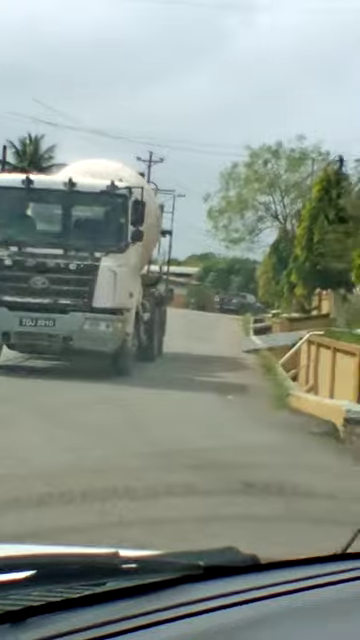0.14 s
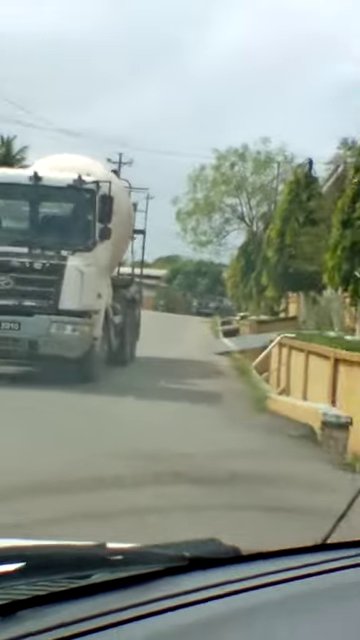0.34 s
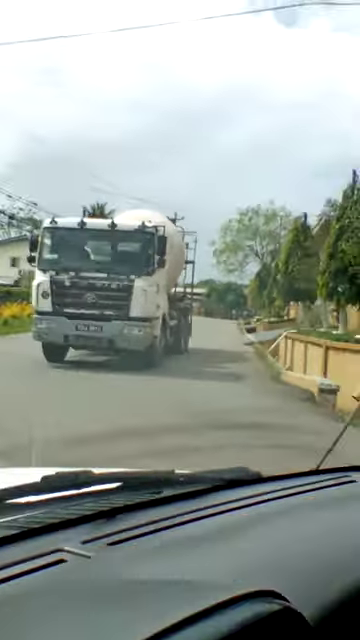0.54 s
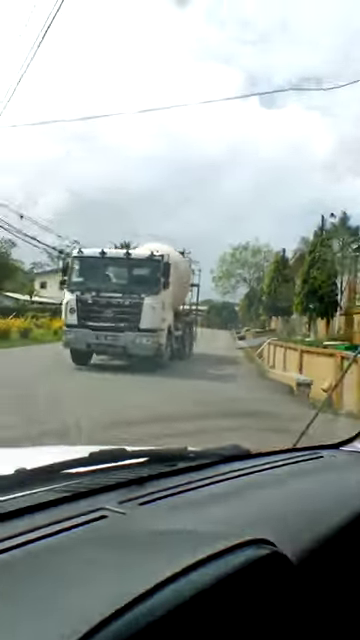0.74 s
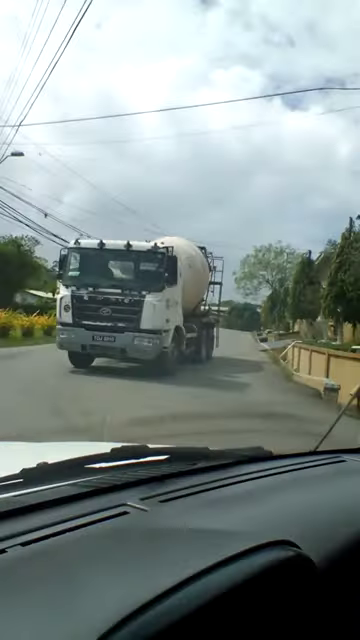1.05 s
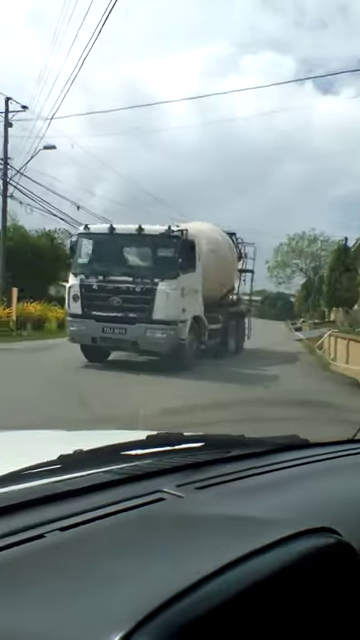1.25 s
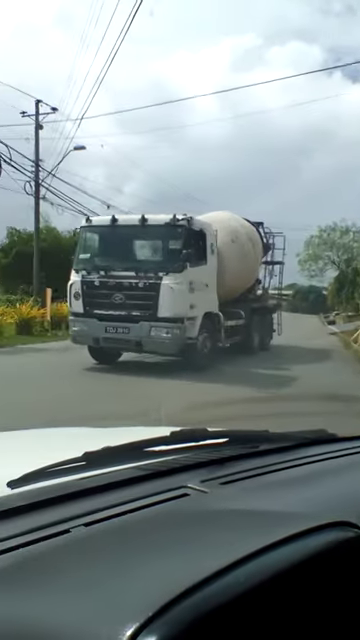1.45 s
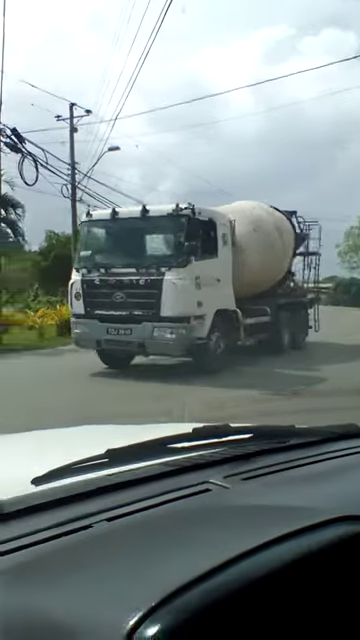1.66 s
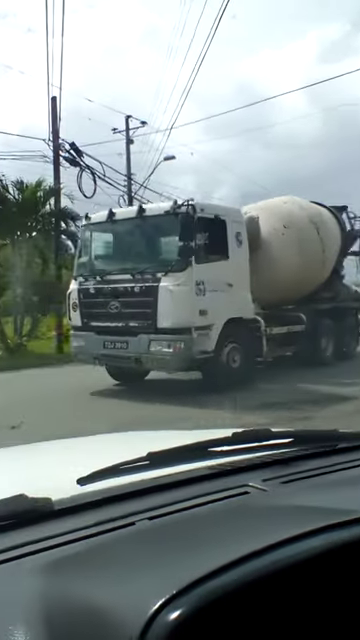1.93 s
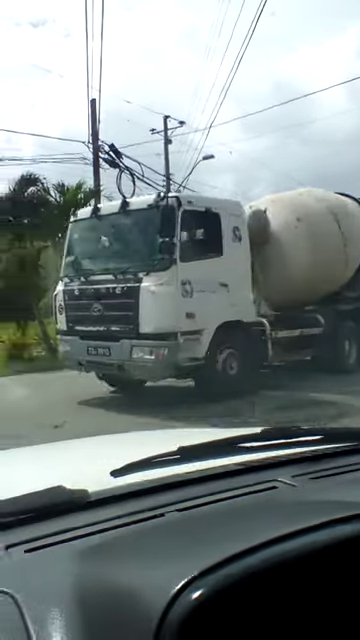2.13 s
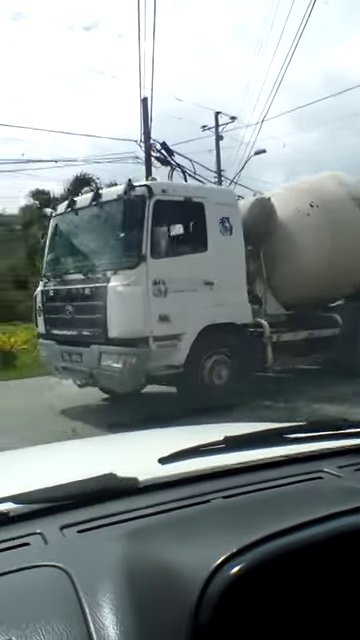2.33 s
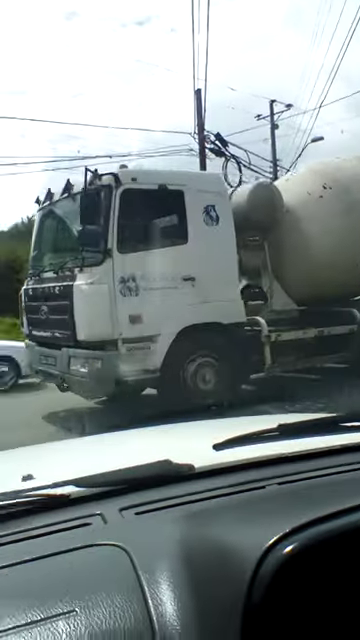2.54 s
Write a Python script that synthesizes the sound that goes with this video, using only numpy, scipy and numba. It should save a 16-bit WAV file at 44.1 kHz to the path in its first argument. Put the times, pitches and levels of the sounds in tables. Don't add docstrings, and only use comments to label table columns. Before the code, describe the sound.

A heavy diesel truck rumbles evenly with a dull metallic clatter, revs briefly early on, then rolls up close. Heard by a phone inside a car, where the indicator ticks and tocks crisply at arm's length.

```python
import sys
import numpy as np
from scipy import signal
from scipy.fft import rfft, irfft, next_fast_len
from scipy.io import wavfile
from scipy.ndimage import uniform_filter1d
from numba import njit

SR = 44100
rng = np.random.default_rng(int(sys.argv[2]) if len(sys.argv) > 2 else 0)


def volts_from_decibels(level):
    exponent = np.asarray(level, float) / 20
    return 10 ** exponent


def persist_wave(psi):
    counts = np.round(np.clip(psi, -1, 1) * 32767).astype(np.int16)
    wavfile.write(sys.argv[1], SR, np.atleast_2d(counts).T)


N = 118629

# (frequency [Hz], level [dB])
HISS_SPECTRUM = [(6000, -6), (8500, -8), (10800, -8.5), (11600, -10.5), (14000, -10.5), (14900, -.5),
                 (15750, 1)]
# (time [s], level [dB])
OVERALL_LEVEL = [
    (.07, -97),
    (.084, -34),
    (.1, -14),
    (.13, -11.5),
    (.2, -5.5),
    (.3, -1.5),
    (.4, .5),
    (2.685, .5),
    (2.69, -4),
]
# (time [s], level [dB])
DASH_CREAKS = [(1.272, -82), (1.353, -83), (1.5217, -81), (1.577, -81), (2.33, -81), (2.4242, -76)]
# (time [s], peak [dB], pitch [Hz], length [s])
LOOSE_RATTLES = [(0.215, -49.5, 2520, 0.013), (0.215, -58, 4550, 0.016), (0.583, -58, 3480, 0.018),
                 (0.584, -61, 5100, 0.021), (0.494, -65, 4840, .015), (0.926, -63, 5000, .01),
                 (0.983, -61.5, 4500, .04), (1.019, -60, 5000, .012), (1.262, -64, 4750, .015),
                 (1.271, -55, 5500, .02), (1.277, -64, 3960, 0.018), (1.291, -56, 5600, 0.012),
                 (1.292, -57.5, 3760, .014), (1.35, -59.5, 5200, 0.018), (1.512, -64.5, 4900, 0.033),
                 (1.581, -63, 6800, 0.0055), (1.722, -67, 5200, 0.038), (1.963, -59, 4600, 0.036),
                 (2.1, -61, 4700, 0.056), (2.22, -57.5, 4360, 0.028), (2.421, -63, 6500, 0.0098)]
# (time [s], peak [dB])
TOCK_TIMES = [(0.411, -41), (1.1205, -43), (1.8267, -39.5), (2.5339, -40.5)]
TICK_TIMES = [(.752, -40), (1.462, -40), (2.168, -39.5)]
# (centre [Hz], width [Hz], level [dB])
TOCK_MODES = [(1390, 390, -5.5), (2950, 220, -6.5), (3370, 120, 1), (3820, 76, -4.5), (4500, 180, -6.5),
              (5170, 250, -14), (5660, 230, -17), (7600, 350, -20.5), (10400, 300, -30),
              (11200, 300, -28.5), (4250, 1800, -5.5), (10000, 2500, -26), (15240, 900, -35)]
TICK_MODES = [(1520, 220, 1.5), (2060, 750, -8), (2630, 170, -2), (3020, 250, 0.5), (3600, 220, -8),
              (4500, 230, -5.5), (5300, 260, -15.5), (6300, 1100, -7.5), (7070, 280, -9.5),
              (10400, 300, -24.5), (4130, 2800, -4.5), (10000, 2500, -28), (15200, 900, -28.5)]
# (centre [Hz], width [Hz], level after the turn [dB], level before it [dB])
PANEL_MODES = [(616, 50, -61, -61.5), (962, 77, -60, -71), (1545, 47, -70, -74), (1363, 54, -78.5, -62.5),
               (2460, 70, -78.5, -74)]
CYLINDER_LEVELS = [0, -4.5, -2, -0.5, -3.5, -2.5]
# (centre [Hz], width [Hz], level [dB])
CABIN_MODES = [(71, 17, -10), (106.2, 23, 1), (142.1, 30, -3.5), (210.8, 33, -7.5), (248.3, 15, -7.5),
               (282.5, 31, -9.5), (319.3, 38, -5.5), (353.2, 29, -10.5), (382.5, 26, -11),
               (469.4, 67, -19.5), (634, 33, -26), (953, 89, -26), (1360, 110, -49)]
# (frequency [Hz], density [dB per Hz])
RUMBLE_SPECTRUM = [(18, -17.5), (30, -23), (100, 1), (167, -12.5), (242, -4), (381, -13), (408, -16.5),
                   (481, -19), (800, -45), (1040, -36.5), (1760, -120)]
CLATTER_SPECTRUM = [(500, 2), (980, -6), (1250, -8), (2600, -15.5), (3200, -23), (4800, -24.5), (6700, -35),
                    (7900, -54)]
# (time [s], rumble [dB], idle boom [dB], clatter [dB])
NEARNESS = [(.1, 3, 1.5, 0), (.2, 2, 0.5, -1.5), (.3, 4, -1.5, 0.5), (.45, 3.3, -1.5, 0),
            (.65, 1.3, -1.5, -1), (.82, 1.5, 1, -0.5), (1., 2.5, 1, 1), (1.2, -1, 1, 0),
            (1.4, 2.5, 2.5, 1.5), (1.6, 2, 1.5, -2), (1.75, 3, -3.5, 2), (1.96, 0, -1, 1.5),
            (2.1, 0.5, 0.8, 1.5), (2.3, 2, -1.5, 1), (2.45, 1.5, -2, 1.6), (2.69, -0.5, -4.5, 1.5)]
# (time [s], firing rate [Hz], level [dB])
TRUCK_REVS = [(.15, 41, -55), (.28, 43, -52), (.36, 44.8, -43), (.44, 45.6, -42), (.52, 46, -39.5),
              (.62, 46.2, -37.5), (.7, 45.5, -42), (.8, 42, -42), (.9, 38.5, -53), (1.1, 35.5, -51),
              (1.3, 33.2, -53), (1.9, 33.8, -55), (2.26, 34, -50), (2.69, 35.4, -46)]
# (multiple of the firing rate [-], level [dB])
EXHAUST_ORDERS = [(1, -2.5), (2, 8.3), (3, -1), (4, -9), (5, -6)]

IDLE_HZ = 35.3
TIME = np.arange(N) / SR


def level(x, db):
    return x * volts_from_decibels(db) / np.sqrt(np.mean(x ** 2))


def curve(table, axis):
    rows = np.array(table)
    return np.interp(TIME, rows[:, 0], rows[:, axis])


def lowpass(x, order, hz):
    return signal.sosfilt(signal.butter(order, hz, fs=SR, output="sos"), x)


@njit
def svf(x, hz, width):
    y, b, l = np.empty(len(x)), 0., 0.
    g, k = np.tan(np.pi * hz / SR), width / hz
    for i in range(len(x)):
        v = (b + g * (x[i] - l)) / (1 + g * (g + k))
        b, l, y[i] = 2 * v - b, l + 2 * g * v, k * v
    return y


def resonance(x, hz, width):
    once = svf(x, float(hz), float(width))
    return svf(once, float(hz), float(width))


def peak(x, hz, width):
    f = np.fft.rfftfreq(len(x), 1 / SR)
    return irfft(rfft(x) * np.exp(-((f - hz) / width) ** 2), len(x))


def walk(rate):
    hold = int(SR / rate)
    steps = np.repeat(rng.standard_normal(N // hold + 1), hold)
    return 1.36 * uniform_filter1d(uniform_filter1d(steps, hold), hold)[:N]


def bands(spectrum, count, patchy_db, rate, shared_db, narrow):
    hz, db = np.array(spectrum).T
    out, size = 0, next_fast_len(N)
    f = np.fft.rfftfreq(size, 1 / SR)
    centres = hz[0] * 2 ** np.arange(0, np.log2(hz[-1] / hz[0]), 1 / count)
    for k, centre in enumerate(centres):
        if k % 5 == 0:
            shared = walk(rate / 2)
            white = rfft(rng.standard_normal(size))
        band = irfft(white * np.exp(-((f - centre) * count / (narrow * centre)) ** 2), size)[:N]
        alone = patchy_db * 1.54 * np.tanh(walk(rate))
        flicker = min(centre / 3200, 1) * (alone + shared_db * shared)
        out = out + band * volts_from_decibels(np.interp(np.log(centre), np.log(hz), db) + flicker)
    return out


def microphone_hiss():
    return level(bands(HISS_SPECTRUM, count=14, patchy_db=.6, rate=30, shared_db=.5, narrow=.65), -81)


def creaks():
    tail_s = .006
    envelope = np.zeros(N)
    for s, db in DASH_CREAKS:
        envelope += volts_from_decibels(db) * (TIME > s) * np.exp(-np.clip(TIME - s, 0, None) / tail_s)
    return envelope * level(peak(rng.standard_normal(N), hz=9500, width=2500), 0)


def rattles():
    out = 0
    for s, db, hz, length in LOOSE_RATTLES:
        age = np.clip((TIME - s) / length, 0, None)
        clicks = rng.standard_normal(N) * volts_from_decibels(1.8 * rng.exponential(size=N))
        ring = level(resonance(clicks, hz, 0.35 * hz), db)
        out = out + ring * np.minimum(6 * age, 1) * np.exp(-age ** 2)
    return lowpass(out, 8, 6900)


def relay(events, modes):
    lead_s, rise_s, chatter_s = .004, .006, .009
    tail_s, tail_db = .024, -9
    out, t = np.zeros(N), np.arange(4096) / SR
    age = np.clip(t - rise_s, 0, None)
    fall = np.exp(-age / chatter_s) + volts_from_decibels(tail_db) * np.exp(-(age / tail_s) ** 4)
    shape = np.minimum(t / rise_s, 1) ** 2 * fall
    for s, db in events:
        bounce = uniform_filter1d(rng.standard_normal(len(t)), size=64) * np.sqrt(64)
        chatter = rng.standard_normal(len(t)) * shape * volts_from_decibels(1.4 * bounce)
        hit = 0
        for hz, width, mode_db in modes:
            gain = volts_from_decibels(mode_db + 2.0 * rng.standard_normal())
            hit = hit + gain * level(peak(chatter, hz, width), 0)
        i = int((s - lead_s) * SR)
        out[i:i + len(t)] += (hit * volts_from_decibels(db) / np.abs(hit).max())[:N - i]
    return out


def firings():
    jitter, scatter_db = .012, 2.5
    knock_width = .4
    chance = rng.standard_normal((128, 2))
    periods = np.arange(len(chance)) + jitter * np.cumsum(chance[:, 0])
    at = np.clip(periods / IDLE_HZ * SR, 0, N - 1).astype(int)
    pulses = np.zeros(N)
    pulses[at] = volts_from_decibels(np.resize(CYLINDER_LEVELS, len(at)) + scatter_db * chance[:, 1])
    fall = np.exp(-IDLE_HZ / (knock_width * SR))
    return pulses, signal.lfilter([1], [1, -fall], pulses)


def cabin_boom(pulses):
    smear_s, wobble_db = .02, 2.6
    echoes = rng.standard_normal(4096) * np.exp(-np.arange(4096) / (smear_s * SR))
    echoes = rfft(echoes, N)
    pulses = irfft(rfft(pulses) * echoes / np.abs(echoes), N)
    boom = 0
    for k, (hz, width, db) in enumerate(CABIN_MODES):
        gain = (-1) ** k * volts_from_decibels(db + wobble_db * walk(5.15))
        boom = boom + gain * resonance(pulses, hz, 0.88 * width)
    return level(lowpass(boom, 4, 1500), -35.5)


def rumble():
    return level(bands(RUMBLE_SPECTRUM, count=6, patchy_db=5.0, rate=8.7, shared_db=5.5, narrow=0.45), -34.3)


def clatter(knock):
    knock_share, knock_rise_s = .2, .004
    knock = level(uniform_filter1d(knock, int(knock_rise_s * SR)), 0)
    cycle_db = 0.5 * np.cos(2 * np.pi * IDLE_HZ / 6 * (TIME - 0.59)) + 0.76 * walk(13)
    metal = bands(CLATTER_SPECTRUM, count=20, patchy_db=5.5, rate=36, shared_db=1.0, narrow=.36)
    return level(metal * (1 - knock_share + knock_share * knock) * volts_from_decibels(cycle_db), -49.5)


def diesel():
    pulses, knock = firings()
    out = rumble() * volts_from_decibels(curve(NEARNESS, axis=1))
    out += cabin_boom(pulses) * volts_from_decibels(curve(NEARNESS, axis=2))
    return out + clatter(knock) * volts_from_decibels(curve(NEARNESS, axis=3))


def panels():
    before = np.clip((1.76 - TIME) / 0.1, 0, 1)
    out = 0
    for hz, width, after_db, before_db in PANEL_MODES:
        ring = level(peak(rng.standard_normal(N), hz, width), 0)
        out = out + ring * volts_from_decibels(after_db + (before_db - after_db) * before + 3.5 * walk(14))
    return out


def truck():
    wobble_db = 2.2
    phase = 2 * np.pi * np.cumsum(curve(TRUCK_REVS, axis=1)) / SR
    tone = 0
    for k, db in EXHAUST_ORDERS:
        tone = tone + volts_from_decibels(db + wobble_db * walk(12)) * np.sin(k * phase + 2 * np.pi * rng.random())
    return np.sqrt(2) * tone * volts_from_decibels(curve(TRUCK_REVS, axis=2))


def scene():
    dashboard = creaks() + relay(TOCK_TIMES, TOCK_MODES) + relay(TICK_TIMES, TICK_MODES)
    outside = rattles() + diesel() + panels() + truck()
    return (dashboard + outside)[None]


def roll_off(x):
    return signal.sosfilt(signal.butter(12, 17090, fs=SR, output="sos"), x)


def record(dry):
    faded = (dry + microphone_hiss()) * volts_from_decibels(curve(OVERALL_LEVEL, axis=1))
    mix = signal.sosfilt(signal.ellip(10, .2, 80, 15780, fs=SR, output="sos"), faded)
    return roll_off(mix)


dry = scene()
out = record(dry)
persist_wave(out)
```